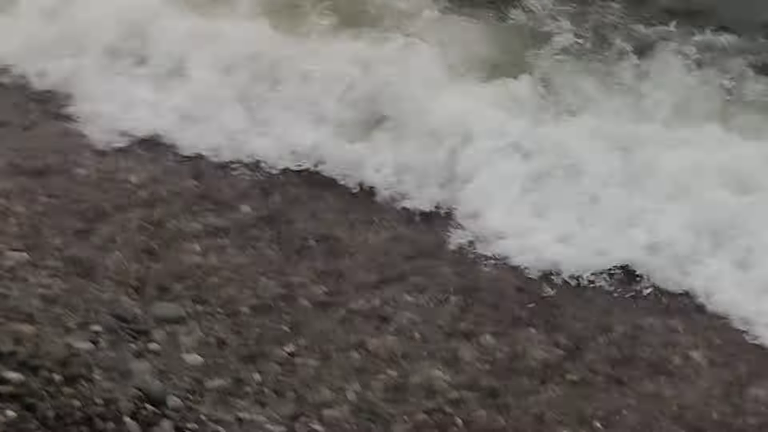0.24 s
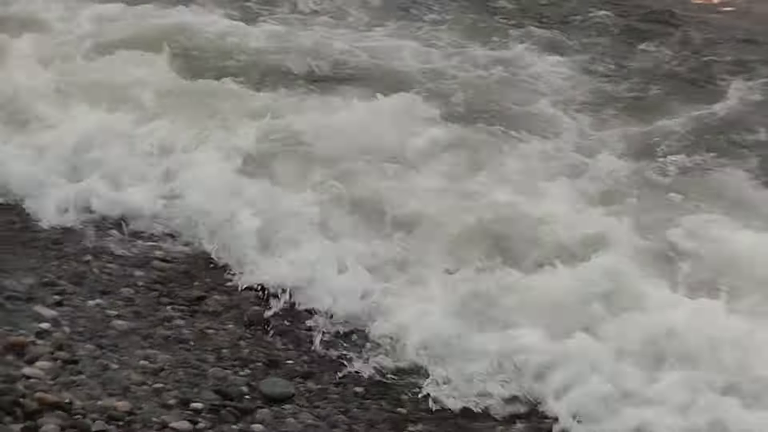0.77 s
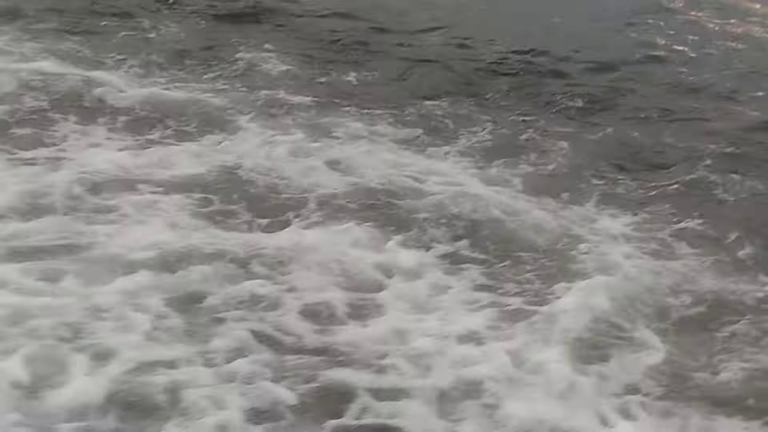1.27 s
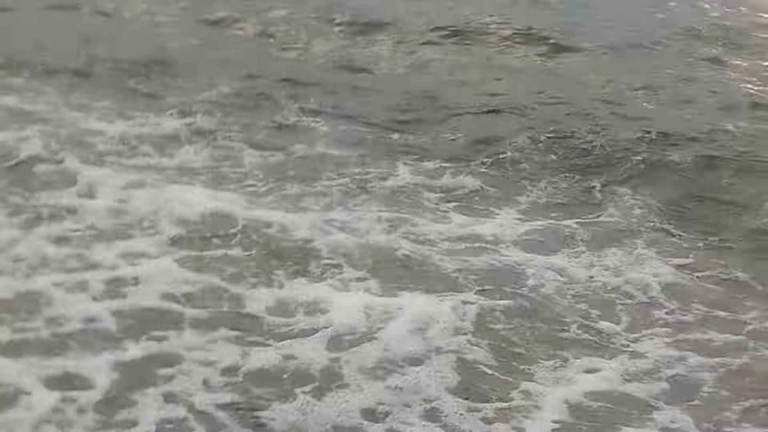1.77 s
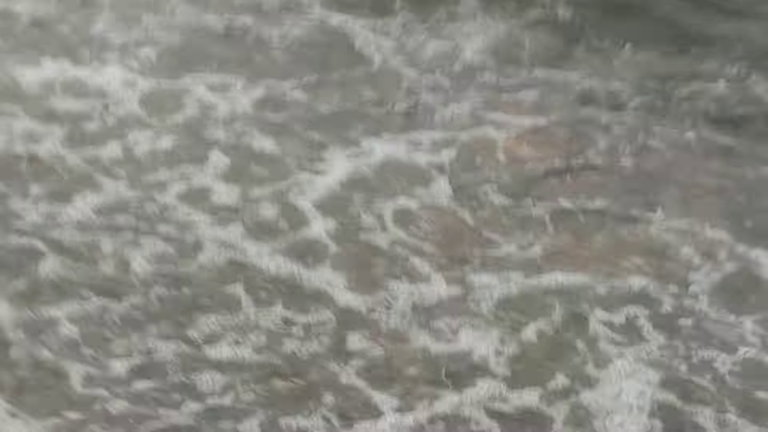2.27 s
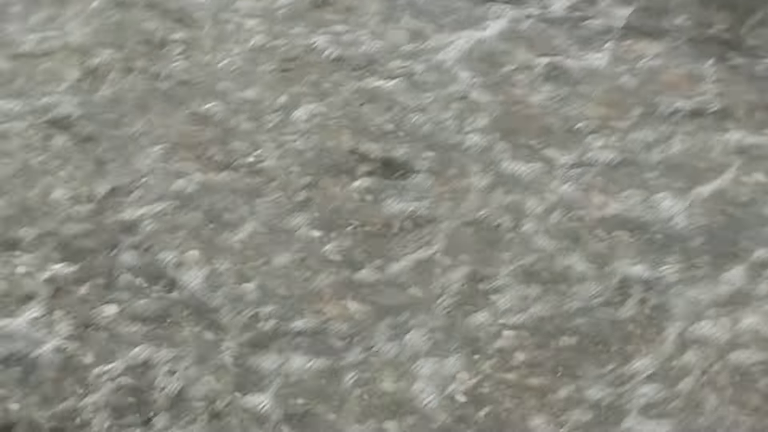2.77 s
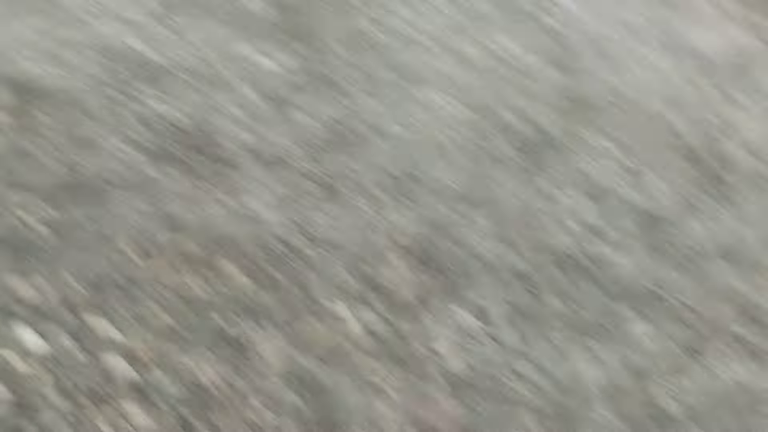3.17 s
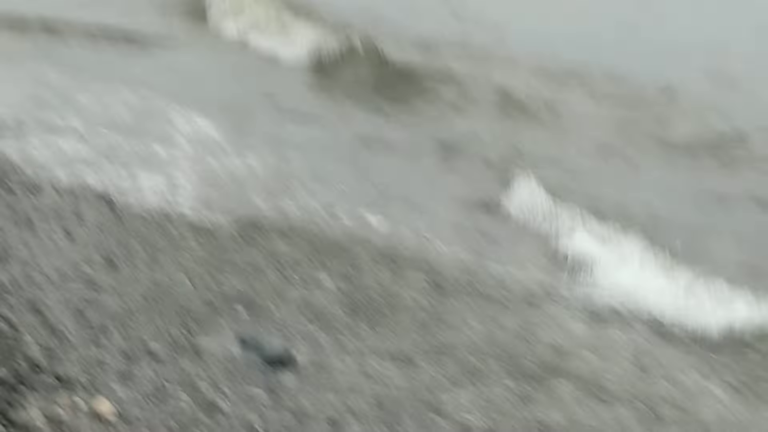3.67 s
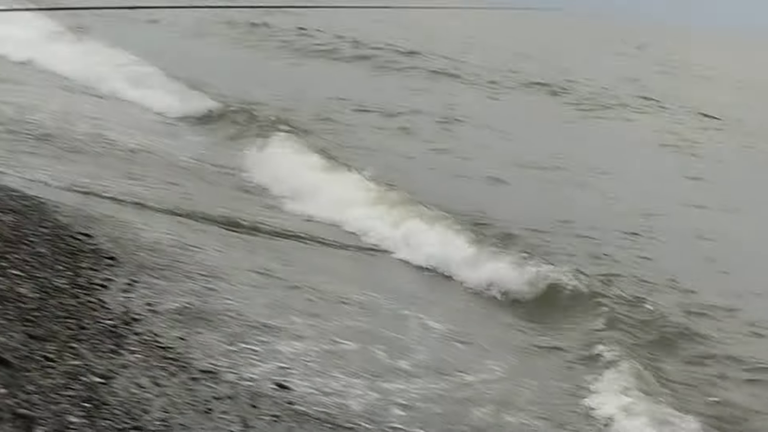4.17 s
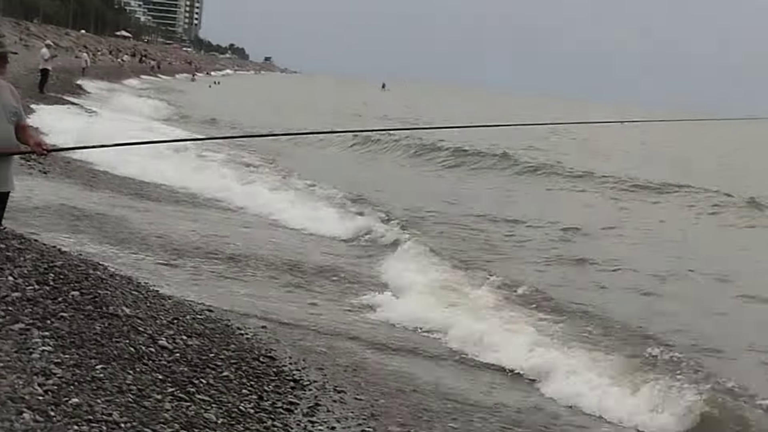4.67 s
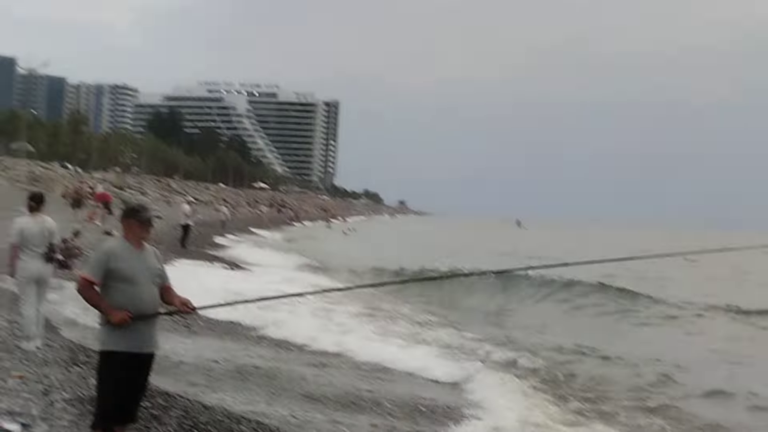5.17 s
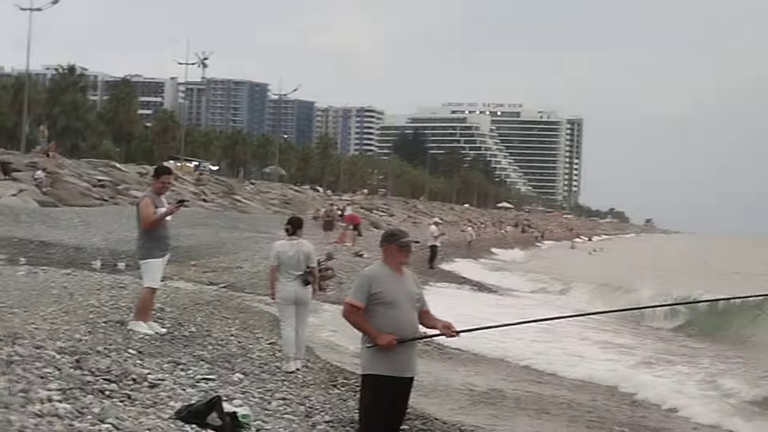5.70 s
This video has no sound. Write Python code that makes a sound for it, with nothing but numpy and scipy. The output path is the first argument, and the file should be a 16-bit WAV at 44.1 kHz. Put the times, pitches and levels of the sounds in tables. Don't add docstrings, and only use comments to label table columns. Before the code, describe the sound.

Outdoor surf heard from a small hand-held microphone near the stones, identical in both channels. Rumbling, churning water and dry pebble clicks open the scene, then thin into a quiet backwash with soft gusts. A sudden burst of sharp, slightly overloaded stone clacks brings in a bigger wave, which hisses, recedes and gives way to a new surge.

```python
import sys
import numpy as np
from scipy import signal
from scipy.io import wavfile
from scipy.ndimage import uniform_filter1d

SR = 44100
rng = np.random.default_rng(int(sys.argv[2]) if len(sys.argv) > 2 else 0)


def wav_record(signal):
    frames = np.transpose(np.atleast_2d(signal))
    bounded = np.clip(frames, -1, 1)
    quanta = np.round(bounded * 32767).astype(np.int16)
    wavfile.write(sys.argv[1], SR, quanta)


def how_loud(loudness_db):
    steps = np.asarray(loudness_db, float) / 20
    return 10 ** steps


N = 261954

# centre in Hz, spread in octaves.
WATER_PARTS = [
    (170, 0.61),
    (450, 0.6),
    (1000, 0.79),
    (2000, 1),
    (6500, 1),
    (14000, 0.63),
]
# level in dB, then its share (dB per dB) of the surge,
# of the hollowness, of the foam's fineness and of the spray.
PART_FOLLOWS = [
    (-35, 0.67, 1.04, -0.11, .01),
    (-35, 1.1, 1.17, -0.086, 0.0013),
    (-32.5, 0.91, -0.24, -0.56, 0.0064),
    (-31.5, 1, -0.23, 0.25, .01),
    (-32.5, 0.045, 0.054, -0.24, 0.9),
    (-48.5, .1, -0.34, .8, 0.76),
]
# time in seconds, surge in dB, hollowness of the plunge in dB,
# fineness of the foam in dB, spray in the air in dB.
WAVE_STATE = [(0, -21.5, -5.5, 2, -25), (.42, -20.5, -4, 0, -26), (.8, -24.5, -6.5, -3.5, -33),
              (1.2, -25.5, -8.5, 0.5, -33.5), (1.6, -27, -11, 1.5, -35), (1.96, -30, -13, -3.5, -38.5),
              (2.24, -31, -8.5, -2.5, -41), (2.55, -31.5, -5, -1, -38.5), (2.9, -34, -6, 0, -36.5),
              (3.1, -29, -6, -4.5, -32), (3.36, -22.5, -6, 4.5, -25), (3.7, -18.5, -5.5, -2, -22.5),
              (4.0, -19.5, -6, 6.5, -22.5), (4.25, -20.5, -8, 1.5, -26), (5.0, -28, -10, 3, -36.5),
              (5.55, -33, -8, 2, -38.5), (5.84, -26.5, -11, 6, -29), (5.94, -21, -6, -1, -27.5)]
MEAN_SURGE_DB, MEAN_HOLLOW_DB, MEAN_SPRAY_DB = -27, -6, -33
HEAVE_DB = 0.98

# frequency in Hz, level in dB per Hz.
BREAKER_COLOUR = [(18, -40), (30, -18), (139, -3.5), (232, 1), (305, -2), (490, -2.5), (645, -3.5),
                  (770, 1.5), (937, -1), (1120, -2.5), (1940, -2.5), (2180, -2), (2990, -19.5),
                  (3300, -23.5), (4290, -51), (7260, -120)]
# frequency in Hz, level in dB.
HOUSING_COLOUR = [(1880, -43), (3200, -14.5), (3800, -6), (4580, -6.5), (5100, -3), (5860, -8.5),
                  (6740, -3), (7550, 1), (10500, -3.5), (12400, -8.5), (15100, -8.5), (15700, -16)]
JOINT_HZ = 3250

# start in seconds, level in dB, rise in seconds,
# time to die by 60 dB in seconds.
CRUNCHES = [(0.018, -22.5, 0.03, 0.16), (0.076, -23, .008, .04), (0.109, -19, .003, 0.036),
            (0.146, -16, 0.0034, 0.093), (0.162, -23, 0.0045, 0.068), (.183, -21, .003, 0.25),
            (.35, -26, .01, 0.73), (0.605, -22, .002, 0.024), (0.712, -20, .002, 0.037),
            (0.725, -17, 0.0023, 0.041), (0.733, -24, .003, 0.11), (0.756, -26, .003, 0.082),
            (.785, -31.5, .003, 0.32), (1.48, -29, 0.011, 0.055), (1.542, -30, 0.034, .1),
            (1.64, -28.5, 0.0027, 0.12), (1.697, -30, .003, 0.094), (2.236, -33.5, 0.016, 0.34),
            (2.293, -33.5, 0.016, 0.31), (2.438, -29, 0.025, 0.13), (2.525, -34, .012, 0.19),
            (2.582, -34.5, 0.012, 0.11), (2.988, -18, 0.005, .09), (2.998, -26, .004, .08),
            (3.008, -23, .004, 0.061), (3.018, -23, 0.0044, 0.069), (3.028, -26.5, .005, 0.45),
            (3.09, -30.5, 0.011, 0.34), (3.16, -28, 0.013, .07), (3.244, -26.5, .005, 0.12)]
HOLD_SHARE = 0.085
# frequency in Hz, level in dB per Hz.
STONE_COLOUR = [(1060, -49), (1800, -7.5), (2320, -11), (2730, -23.5), (3460, -39), (3920, -23.5),
                (5150, -14), (6290, -14), (7200, -4), (7670, -2), (9280, -6), (10700, -12), (11700, -17),
                (15000, -20), (15700, -20)]
# time in seconds, lift of the top octave in dB.
STONES_FACING = [(0, -5), (.25, -1), (.4, -15), (1.7, -19), (2.25, -4), (2.5, -5), (2.96, -9), (2.98, 1),
                 (3.16, 3), (3.9, -1)]
DRAG_S, DRAG_PEAK_S, DRAG_END_S, DRAG_DB, DRAG_TOP_DB = 2.55, 2.95, 3.0, -38, -21

# time in seconds, peak in dB, ringing pitch in Hz.
SINGLE_CLICKS = [(0.0887, -5, 8230), (0.1083, 1, 7410), (0.1138, -7, 7450), (0.131, -5, 8350),
                 (0.1469, -7, 8530), (0.1499, 0, 8440), (0.1652, -4, 7280), (0.1869, -9, 9090),
                 (.352, -8, 7800), (0.421, -11, 7490), (0.448, -9, 7970), (0.5561, -13, 8100),
                 (0.6078, -8, 8790), (0.715, -3, 8740), (0.7188, -9, 8140), (0.7287, 0, 7450),
                 (0.7605, -10, 8010), (0.823, -11, 7710), (1.0428, -18, 8790), (1.1948, -17, 7620),
                 (1.4962, -16, 7880), (1.5734, -15, 8100), (1.6359, -13, 7880), (1.6402, -11, 8740),
                 (1.709, -14, 7410), (2.345, -18, 8200), (2.3799, -17, 6550), (2.4704, -16, 8230),
                 (2.5749, -18, 8790), (2.6371, -17, 8100),
                 (1.64, -21, 4600), (1.7005, -19, 5600), (1.7005, -17, 10800), (1.7095, -19, 5500),
               (2.262, -24, 5500), (2.305, -24, 5500), (2.682, -25, 5500), (2.813, -22, 5080),
               (.755, -12, 9500), (.81, -15, 9500)]
# time in seconds, peak in dB, peak of the high edge in dB.
FALLING_STONES = [(.2201, -14, -18), (2.9949, -6, -22), (2.9988, -3, -25), (3.0039, -3, -20),
                  (3.008, -1, -21), (3.0135, -4, -16), (3.0197, -2, -22), (3.0243, -4, -23),
                  (3.0685, -14, -25), (3.0952, -9, -29), (3.1, -7, -32), (3.1152, -12, -21),
                  (3.1283, -8, -21), (3.1655, -17, -22), (3.1776, -9, -13), (3.1829, -7, -24),
                  (3.1876, -15, -19), (3.2116, -14, -21), (3.2252, -11, -17), (3.2493, -12, -21),
                  (3.265, -13, -26), (3.3013, -10, -21), (3.3291, -11, -22), (3.3357, -14, -19),
                  (3.3504, -11, -30), (3.4263, -10, -23), (3.5406, -11, -22), (3.5681, -12, -21),
                  (3.59, -7, -20), (3.6255, -6, -31)]
# start in seconds, end in seconds, how many, typical peak in dB.
STRAY_CLICKS = [(.19, .3, 2, -13), (.73, .85, 5, -14), (1.2, 1.45, 4, -21), (1.48, 1.72, 6, -19),
                (1.78, 1.92, 3, -22), (2.24, 2.95, 14, -22), (2.992, 3.03, 6, -6), (3.05, 3.45, 18, -18),
                (3.6, 3.9, 6, -11), (5.67, 5.69, 1, -21)]
RING_HZ, RING_SPREAD_HZ, STRAY_SPREAD_DB = 8000, 560, 2.5
EDGE_DB, EDGE_SPREAD_DB = -13, 4
CLICKS_DB = -1.8

# time in seconds, level in dB.
WIND_LEVEL = [(0, -41), (1.1, -44), (2.1, -48), (2.65, -40.5), (3.1, -51), (3.9, -47), (5.94, -49)]
WIND_HZ, WIND_WIDTH_HZ, LUMPY_DB = 41.8, 50, 3.5
# time in seconds, peak in dB, pitch in Hz,
# length in seconds.
GUST_THUMPS = [(1.022, -25, 62, .05), (1.35, -32, 50, .06), (1.45, -34, 42, .06), (2.285, -29, 55, .04),
               (2.53, -30, 55, .05), (2.588, -23, 80, .03), (2.6, -26, 40, .075), (2.755, -27, 58, .045)]


def surf(patchy_db=0.61, flicker_db=0.6, gurgle_db=0.62):
    frames, hz = N // 128 + 5, np.fft.rfftfreq(512, 1 / SR)
    t = np.arange(frames) * 128 / SR
    real, imaginary, patches = rng.standard_normal((frames, len(hz), 3)).T
    noise = real + 1j * imaginary
    patches = uniform_filter1d(patches, size=6, axis=0)
    patches = evened(uniform_filter1d(patches, size=30, axis=1))
    flicker = wander(frames, 4)
    gurgle = wander(frames, 30, 20)
    power = 0
    for (centre_hz, spread), follow in zip(WATER_PARTS, PART_FOLLOWS):
        octaves = np.log2((hz + 20) / centre_hz)
        shape = how_loud(2 * heard_db(hz)) * np.exp(-(octaves / spread) ** 2)
        heave_db = HEAVE_DB * (centre_hz < JOINT_HZ) * wander(frames, 50, 35)
        loudness = how_loud(2 * (part_db(t, *follow) + heave_db))
        power = power + np.outer(shape / shape.sum(), loudness)
    treble = np.clip(hz / 3000, 0, 1)[:, None]
    foam = np.exp(-np.log2((hz + 20) / 1400) ** 2)[:, None]
    motion_db = patchy_db * patches + flicker_db * treble * flicker + gurgle_db * foam * gurgle
    water = signal.istft(noise * np.sqrt(power) * how_loud(motion_db), nperseg=512, noverlap=384)[1]
    plain = signal.istft(noise / np.sqrt(len(hz)), nperseg=512, noverlap=384)[1]
    return water[:N] / plain.std()


def part_db(t, level_db, surge, hollow, fine, spray):
    surge_db, hollow_db, fine_db, spray_db = curve(WAVE_STATE, t)
    plunge_db = surge * (surge_db - MEAN_SURGE_DB) + hollow * (hollow_db - MEAN_HOLLOW_DB)
    return level_db + plunge_db + fine * fine_db + spray * (spray_db - MEAN_SPRAY_DB)


def heard_db(hz):
    step_db = read(HOUSING_COLOUR, JOINT_HZ) - read(BREAKER_COLOUR, JOINT_HZ)
    low_db = read(BREAKER_COLOUR, hz) + step_db
    return np.where(hz < JOINT_HZ, low_db, read(HOUSING_COLOUR[:-1], hz))


def crunch():
    out, t = np.zeros(N), np.arange(20000) / SR
    per_s, uneven_db = 5500, 3.6
    happens = rng.random(N) < per_s / SR
    size = how_loud(uneven_db * np.minimum(rng.exponential(1, N), 4)) * happens
    grit = evened(size * rng.choice([-1., 1.], N))
    for s, level_db, rise, t60 in CRUNCHES:
        dying_s = np.maximum(t - rise - HOLD_SHARE * t60, 0)
        press = np.clip(t / rise, 0, 1) * how_loud(level_db - 60 * dying_s / t60)
        shower = press * grit[round(s * SR):][:len(t)]
        add(out, s, signal.oaconvolve(shower, stone(curve(STONES_FACING, s)[0])))
    drag = np.interp(np.arange(N) / SR, [DRAG_S, DRAG_PEAK_S, DRAG_END_S], [0, 1, 0]) ** .5
    out += how_loud(DRAG_DB) * signal.oaconvolve(drag * grit, stone(DRAG_TOP_DB))[:N]
    return out


def clicks():
    out, t = np.zeros(N), np.arange(260) / SR
    rise, edge_hz, ring_db, snap_db = .00032, 15000, -2, -5.5
    snap = stone(-17.0)[:len(t)]
    snap = how_loud(snap_db) * snap / abs(snap).max()
    for (s, peak_db, hz, edge_db), chance in zip(contacts(), rng.random((400, 3))):
        hardness = how_loud(peak_db)
        swell = rise * (1 + 1.2 * hardness)
        ring_shape = (t / swell * np.exp(1 - t / swell)) ** 2
        body = how_loud(ring_db) * ring_shape * np.sin(2 * np.pi * (hz * t + chance[0])) + snap
        edge_shape = (t / rise * np.exp(1 - t / rise)) ** 6
        this_edge_hz = edge_hz * (.94 + .1 * chance[1])
        edge = edge_shape * np.sin(2 * np.pi * (this_edge_hz * t + chance[2]))
        click = hardness * (1 + .4 * hardness) * body + how_loud(edge_db + 4.5) * edge
        add(out, s - rise, click)
    return out


def contacts():
    rows = [(s, db, hz, 0) for s, db, hz in SINGLE_CLICKS]
    rows += [(s, db, 0, edge) for s, db, edge in FALLING_STONES]
    for start, end, count, db in STRAY_CLICKS:
        for s in rng.uniform(start, end, count):
            rows.append((s, db + STRAY_SPREAD_DB * rng.standard_normal(), 0, 0))
    s, peak_db, hz, edge_db = np.array(rows).T
    chance = np.clip(rng.standard_normal((len(s), 2)), -2, 2).T
    usual_hz = RING_HZ + RING_SPREAD_HZ * chance[0]
    usual_db = np.minimum(peak_db, -5) + EDGE_DB + curve(STONES_FACING, s)[0] + EDGE_SPREAD_DB * chance[1]
    return np.transpose([s, peak_db, np.where(hz, hz, usual_hz), np.where(edge_db, edge_db, usual_db)])


def stone(top_db):
    hz = np.fft.rfftfreq(2048, 1 / SR)
    top = np.interp(hz, [11700, 12600], [0, top_db])
    return causal(np.maximum(read(STONE_COLOUR[:-1], hz), -45) + top)


def wind():
    push = ring(rng.standard_normal(N), WIND_HZ, WIND_WIDTH_HZ)
    push = evened(ring(push, WIND_HZ, 2 * WIND_WIDTH_HZ))
    level_db = curve(WIND_LEVEL, np.arange(N) / SR)[0]
    out = push * how_loud(level_db + LUMPY_DB * wander(N, 5000, 5000))
    for s, peak_db, hz, length in GUST_THUMPS:
        t = np.arange(0, length, 1 / SR)
        add(out, s, how_loud(peak_db) * np.sin(2 * np.pi * hz * t) * np.hanning(len(t)))
    return out


def evened(x):
    return x / np.sqrt(np.mean(x ** 2) + 1e-20)


def wander(count, *sizes):
    x = rng.standard_normal(count)
    for size in sizes:
        x = uniform_filter1d(x, size=size)
    return evened(x)


def read(points, hz):
    f, value = np.transpose(points)
    return np.interp(np.log(hz + 1), np.log(f + 1), value)


def curve(rows, t):
    s, *columns = np.transpose(rows)
    return [np.interp(t, s, c) for c in columns]


def add(mix, s, sound):
    part = mix[round(s * SR):][:len(sound)]
    part += sound[:len(part)]


def causal(gain_db):
    log_gain = np.log(how_loud(np.r_[gain_db, gain_db[-2:0:-1]]))
    phase = -signal.hilbert(log_gain).imag
    taps = np.fft.ifft(np.exp(log_gain + 1j * phase)).real[:1024]
    return taps / np.linalg.norm(taps)


def ring(x, hz, width_hz):
    return signal.lfilter(*signal.iirpeak(hz, hz / width_hz, SR), x)


def scene():
    heard = surf() + crunch() + how_loud(CLICKS_DB) * clicks() + wind()
    return np.tile(heard, (2, 1))


def band_limit(x):
    return signal.sosfilt(signal.butter(12, 16380, fs=SR, output="sos"), x)


def record(dry):
    low_pass = signal.firwin(1023, 15800, window=("kaiser", 9), fs=SR)
    limited = signal.oaconvolve(dry, low_pass[None], "same")
    finished = np.clip(limited, -1, 1)
    return band_limit(finished)


dry = scene()
out = record(dry)
wav_record(out)
```